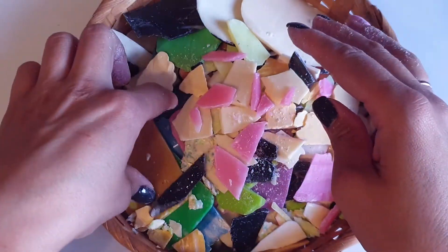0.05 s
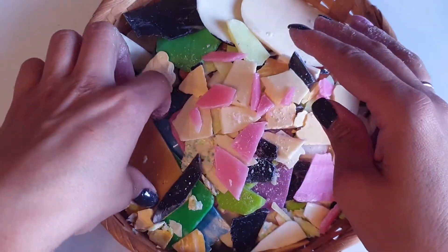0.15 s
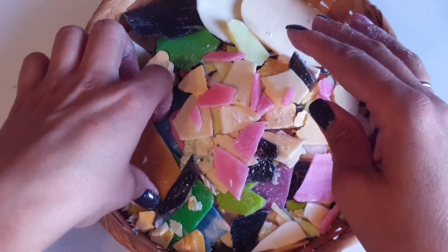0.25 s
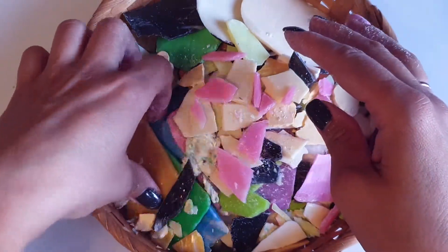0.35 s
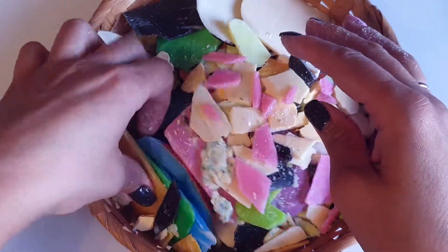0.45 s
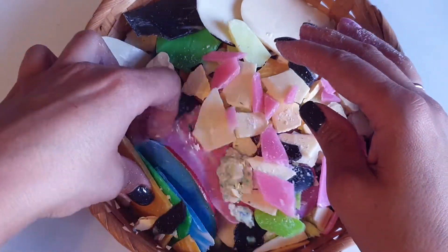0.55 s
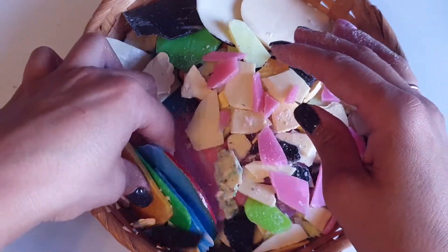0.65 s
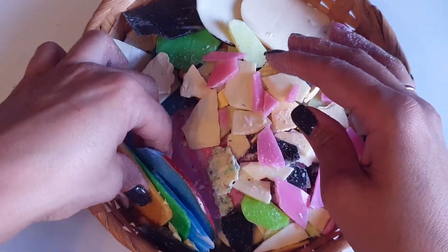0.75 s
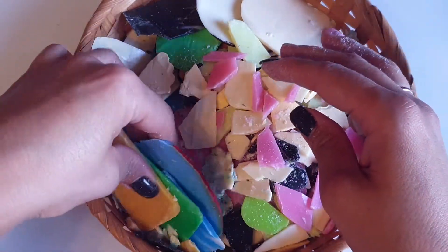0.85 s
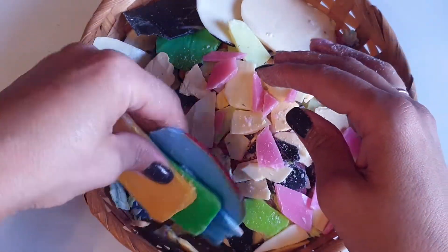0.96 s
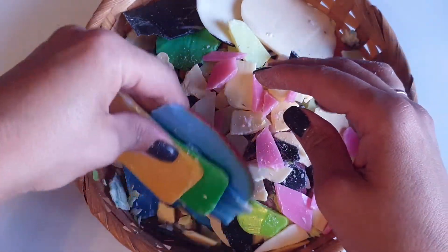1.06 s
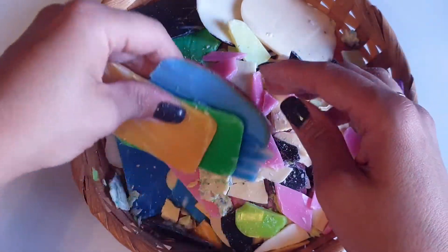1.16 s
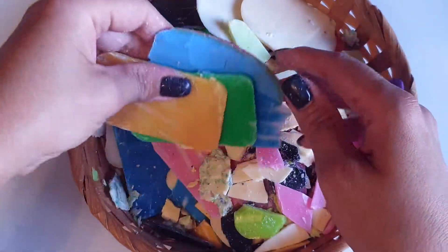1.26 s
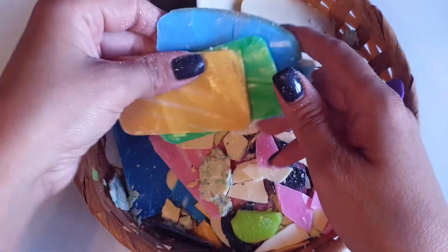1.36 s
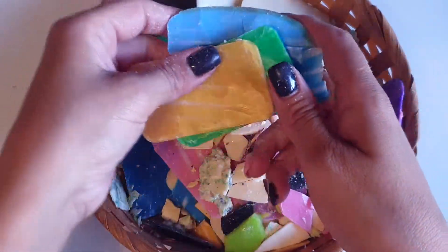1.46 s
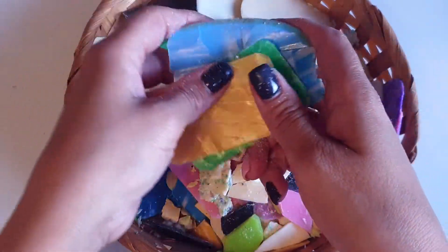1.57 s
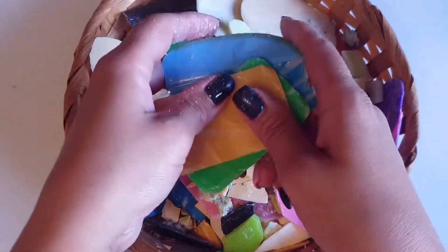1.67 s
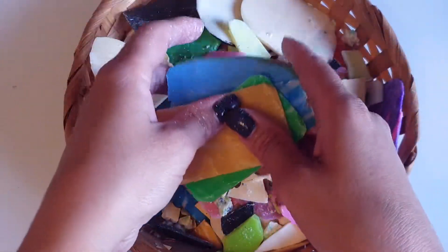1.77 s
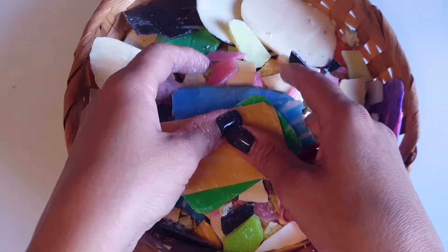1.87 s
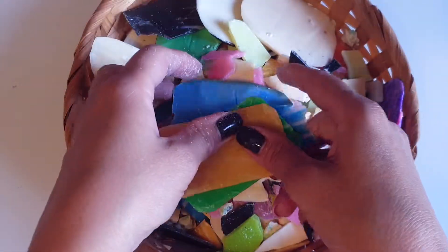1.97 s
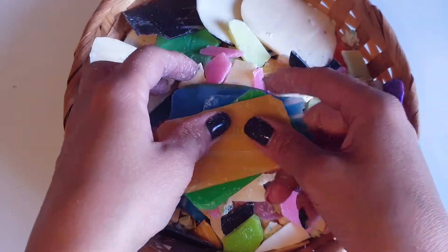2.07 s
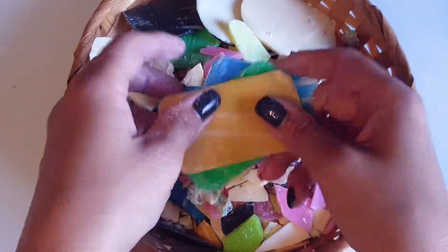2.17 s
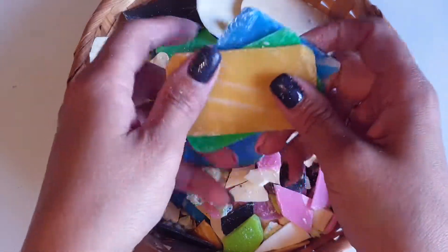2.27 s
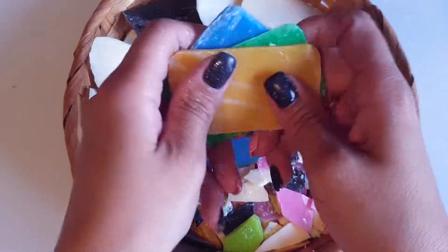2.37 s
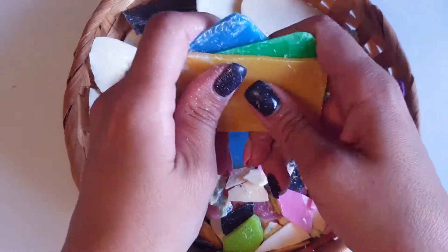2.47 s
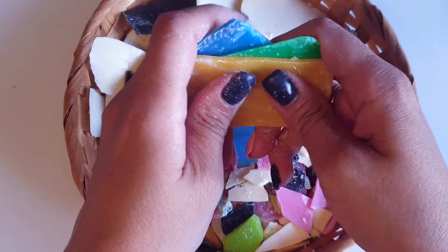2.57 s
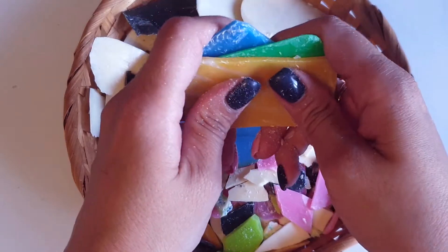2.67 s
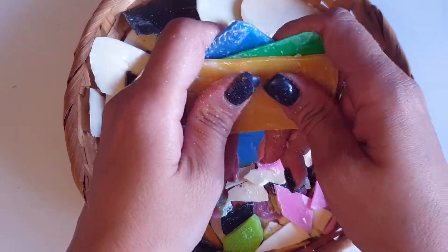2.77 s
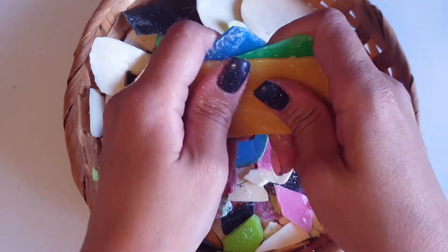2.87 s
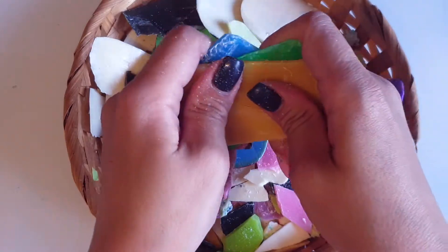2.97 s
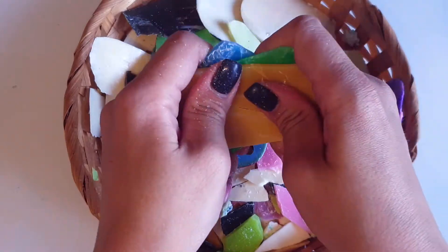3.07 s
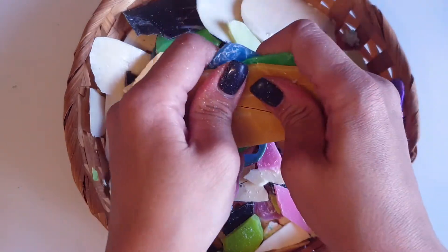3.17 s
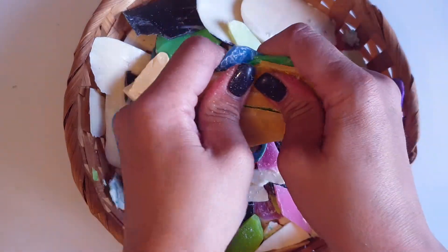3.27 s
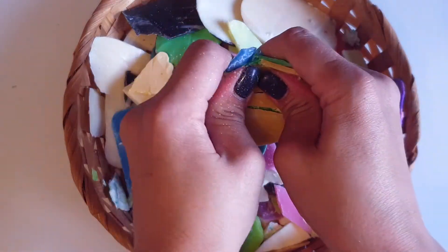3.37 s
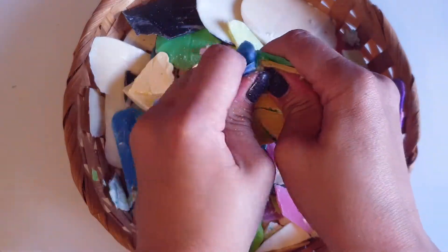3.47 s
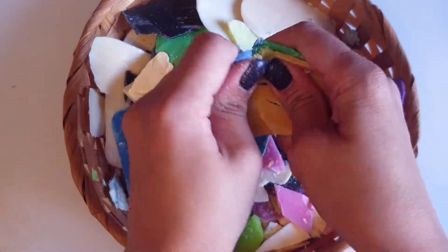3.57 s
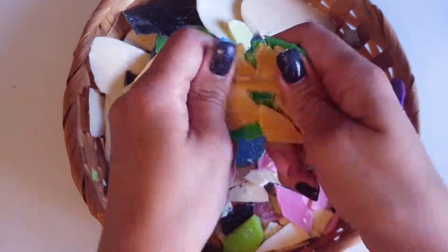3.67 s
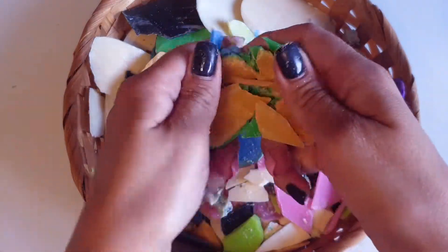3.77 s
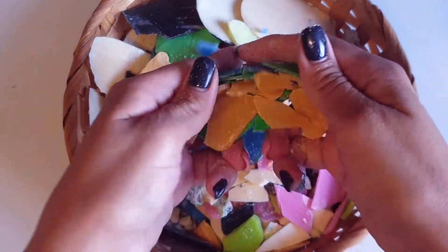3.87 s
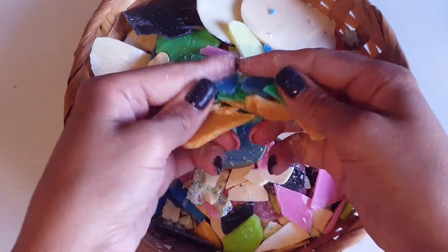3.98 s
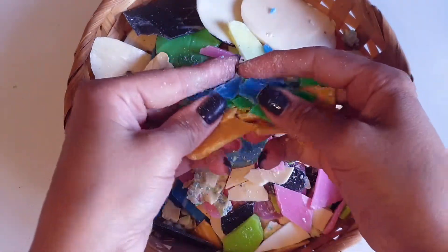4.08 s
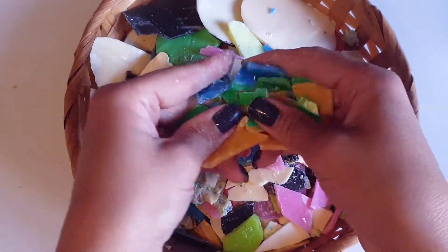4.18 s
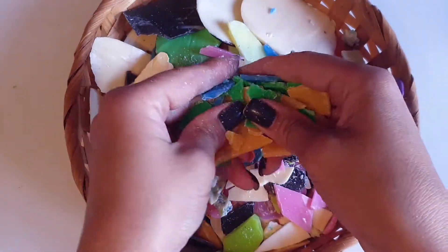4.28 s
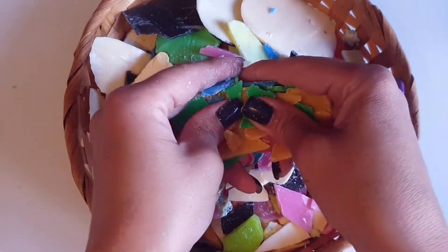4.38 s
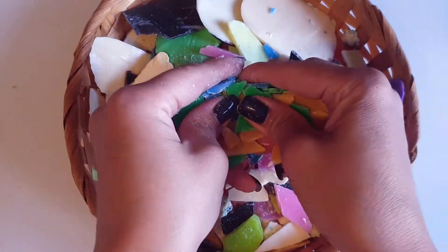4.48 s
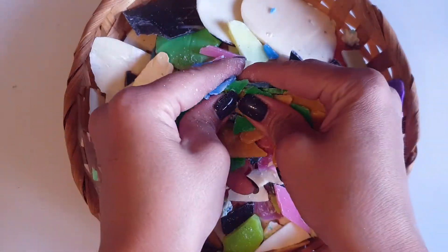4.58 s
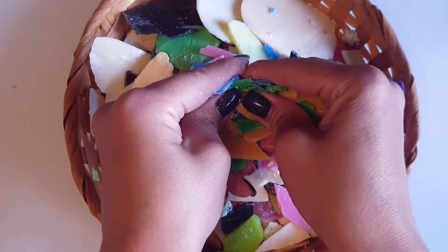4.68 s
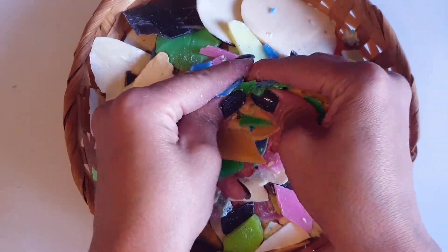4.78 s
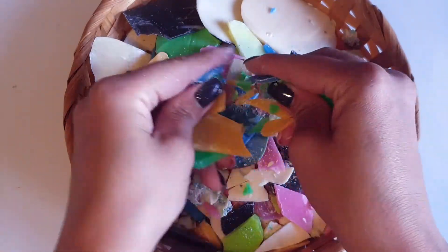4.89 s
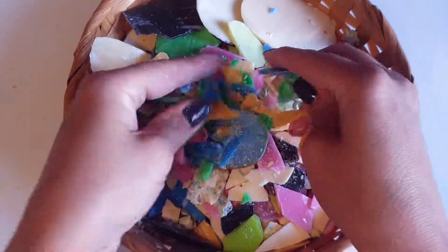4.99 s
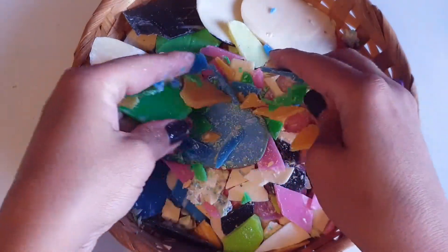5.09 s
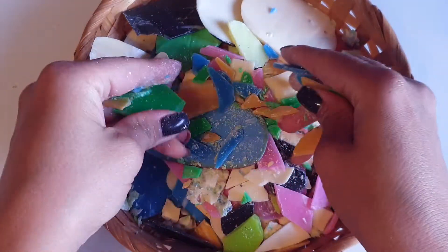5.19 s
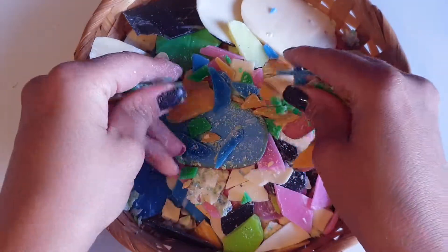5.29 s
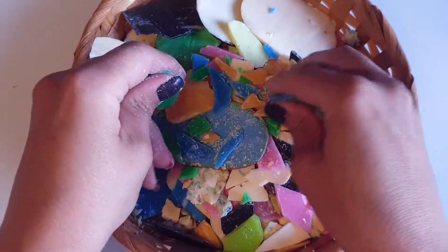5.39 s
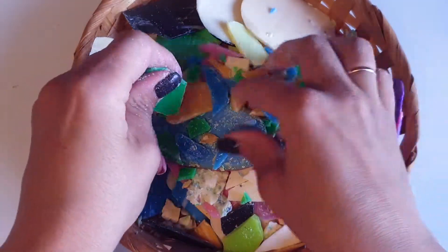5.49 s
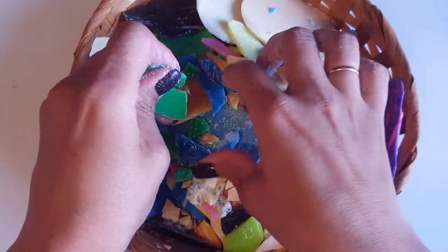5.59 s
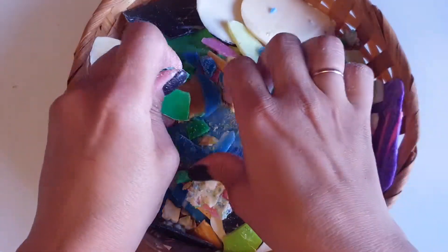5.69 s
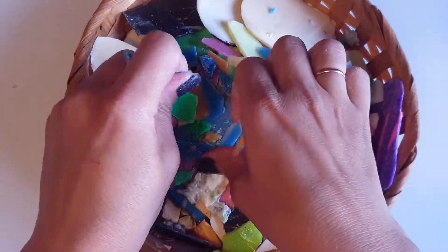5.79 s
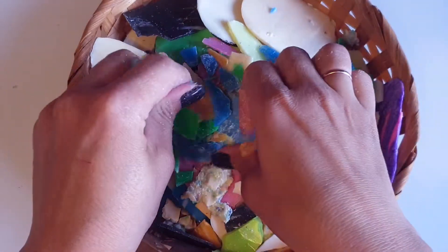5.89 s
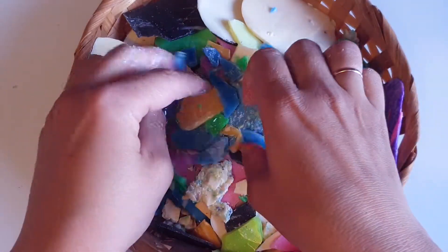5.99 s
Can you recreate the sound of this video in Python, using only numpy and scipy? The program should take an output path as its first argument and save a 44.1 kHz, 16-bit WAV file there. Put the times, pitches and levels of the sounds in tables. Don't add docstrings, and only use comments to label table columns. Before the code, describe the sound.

Thin dry soap shards rustle and knock in a wicker basket, then plates snap in loud sharp cracks and crumble into small clicking bits.

```python
import sys
import numpy as np
from scipy import signal
from scipy.fft import rfft, irfft
from scipy.io import wavfile

SR = 44100
rng = np.random.default_rng(int(sys.argv[2]) if len(sys.argv) > 2 else 0)


def transcribe(u):
    v = np.clip(np.atleast_2d(u).T, -1, 1)
    q = np.round(v * 32767).astype(np.int16)
    wavfile.write(sys.argv[1], SR, q)


def boost(x):
    u = np.asarray(x, float) / 20
    return 10 ** u


N = 266364

# (time [s], peak [dB], shard ring [Hz], support share [dB], crack length [ms])
SNAP_EVENTS = [(2.935, -1, 5100, -10, 0.92), (2.9385, -27, 4500, -23, 1.5), (2.951, -10.5, 3500, -38, 3.5),
               (2.9874, -15.5, 6500, -3.5, 1.6), (2.9935, -14.5, 6470, -32, 1.1),
               (3.0545, -14.5, 10300, -21, 1.5), (3.0664, -17, 7900, -41.5, .6),
               (3.0684, -4.5, 3020, -55, 2.1), (3.0721, -6, 5400, -9, 1.9), (3.0742, -6.5, 4600, -7, 0.82),
               (3.0762, -9, 3240, -9.5, 1.1), (3.0805, -9, 5000, -20, 3.2), (3.1203, -1.5, 4300, -33, 0.61),
               (3.1907, -30.5, 2880, -39, 6.2), (3.2265, -12.5, 2700, -9, 1.2),
               (3.2339, -6.5, 6240, -21.5, 1.2), (3.2369, -11, 5000, -26, 1.2),
               (3.2874, -19, 3270, -41, 0.77), (3.3055, -14.5, 5160, -40, 0.54),
               (3.3207, -15.5, 4600, -34, 1.3), (3.3252, -17.5, 6000, -28, 1.7),
               (3.3803, -38, 2430, -30, 1.1), (3.4178, -39, 2430, -39, 0.41),
               (3.4283, -21.5, 6300, -28, 1.74), (3.455, -23.5, 3620, -17, 2.1)]
# (time [s], peak [dB], shard ring [Hz], support share
# [dB])
HEAP_EVENTS = [(0.014, -40, 1320, -7), (0.025, -39, 1380, -2), (0.057, -34, 2880, -24),
               (0.063, -44, 2850, -30), (0.081, -43, 2900, -27), (0.092, -51, 2250, -18),
               (0.104, -58, 2260, -20), (0.128, -52, 2880, -23), (0.148, -57, 2300, -18),
               (0.183, -44.5, 2950, -44), (0.217, -64, 1280, -10), (0.235, -54.5, 2750, -13),
               (0.259, -61, 1200, -10), (0.278, -54, 1150, -45), (0.318, -74, 2300, -20),
               (0.337, -44, 2470, -34), (0.373, -43, 1310, 0), (0.397, -40, 1440, 18),
               (0.404, -43, 1420, -12), (0.43, -32, 2310, -6), (0.448, -33, 1840, -15),
               (0.454, -32, 1380, -65), (0.475, -36.5, 1420, -4), (0.506, -36, 2230, -19),
               (0.522, -36, 1350, 10), (0.582, -32, 1360, 6), (0.596, -24.5, 1950, -6),
               (0.602, -27, 1110, 4), (0.613, -43, 1550, 14), (0.627, -30.5, 1300, 15),
               (0.663, -51, 1460, -19), (0.673, -33, 1450, 3), (0.72, -38, 6900, -12),
               (0.769, -38.5, 6160, -13), (0.783, -39, 2670, -34), (0.788, -38, 6100, -17),
               (0.792, -30, 2820, -26), (0.795, -35, 2770, -23), (0.834, -32, 2900, -9),
               (0.858, -31, 2900, -29), (0.883, -33, 2800, -73), (0.977, -22, 6240, -13),
               (0.983, -37, 2210, -15), (1.004, -33.5, 1330, -11), (1.008, -34, 2790, -8),
               (1.014, -34.5, 1510, 3), (1.025, -31.5, 2870, -41), (1.04, -41.5, 1670, -28),
               (1.065, -43, 2120, -23), (1.111, -51, 5400, -30), (1.144, -44.5, 5800, -1)]
# (time [s], peak [dB], shard ring [Hz], support share [dB])
STACK_EVENTS = [(1.432, -62.5, 1570, -9), (1.499, -50, 6900, -4), (1.553, -42, 4070, -9.5),
                (1.58, -54, 1710, -10), (1.615, -64, 1310, -5), (1.646, -54, 4600, 9),
                (1.657, -41.5, 2190, -19), (1.717, -54, 1800, -16), (1.77, -46.5, 4970, -12),
                (1.87, -68, 1400, -7), (1.897, -60, 5000, 5), (1.927, -62, 2500, -10),
                (1.946, -34.5, 1285, -6), (1.958, -36.5, 1180, -3.5), (1.981, -44, 1080, -5),
                (1.988, -41.5, 1210, 0), (1.996, -38.5, 1160, -2), (2.029, -49, 2340, 1),
                (2.06, -48.5, 2270, -11), (2.088, -65, 6960, -30), (2.298, -63, 1160, 0),
                (2.31, -56, 4100, -3), (2.321, -53.5, 1510, -12), (2.377, -40.5, 1560, -19)]
# (time [s], peak [dB], shard ring [Hz], support share [dB])
CRUMB_EVENTS = [(3.625, -27.5, 6000, -21.5), (3.629, -34, 2730, -10.5), (3.637, -39.5, 2630, -16),
                (3.748, -46.5, 7900, -15), (3.776, -60, 3460, -23), (3.808, -51, 3600, 0),
                (3.82, -41, 3800, -13), (3.932, -37, 5660, -10), (3.937, -31, 6400, -14.5),
                (3.967, -45, 3810, -8), (4.002, -28, 7100, -22), (4.032, -39.5, 2700, -5.5),
                (4.073, -38, 2300, -4.5), (4.091, -34.5, 2740, -13), (4.113, -49, 2740, 12),
                (4.136, -44.5, 2520, -2), (4.179, -46.5, 10100, -43), (4.229, -45, 7000, -46),
                (4.247, -48, 5040, -22), (4.274, -53, 4400, -28), (4.335, -45.5, 10800, -69),
                (4.428, -36.5, 2550, -29.5), (4.436, -50, 4010, 13), (4.509, -49.5, 2730, -62),
                (4.548, -40.5, 10300, -26), (4.58, -41.5, 4640, -22), (4.602, -39.5, 2570, -31),
                (4.609, -35, 6600, -40), (4.66, -41, 2650, 2), (4.67, -37, 7200, -12.5)]
# (time [s], peak [dB], shard ring [Hz], support share [dB])
DROP_EVENTS = [(4.76, -36.5, 1670, -77), (4.803, -43, 2320, -3), (4.809, -45, 6600, -18),
               (4.819, -33, 5000, -20), (4.824, -24.5, 2660, -13), (4.851, -46, 2620, -22),
               (4.873, -32.5, 2560, -34), (4.885, -40.5, 2500, -2), (4.921, -36.5, 2590, -29),
               (4.932, -28.5, 5470, -12), (4.966, -36, 2700, -6.5), (4.981, -40, 2900, -8),
               (4.992, -32, 2640, -16), (4.998, -31, 2480, -14), (5.007, -41, 3000, -29),
               (5.027, -33.5, 4470, -9), (5.046, -37.5, 2900, -13), (5.079, -33, 4070, -4.5),
               (5.18, -47, 5100, -15), (5.214, -22, 6730, -18), (5.298, -40, 4250, -16)]
# (time [s], peak [dB], shard ring [Hz], support share [dB])
GATHER_EVENTS = [(5.384, -57, 3850, -8), (5.401, -46, 6330, -26), (5.413, -47, 3300, -64),
                 (5.431, -38, 5900, -18), (5.45, -38, 5400, -23), (5.474, -41, 4100, -29),
                 (5.489, -29.5, 8280, -20), (5.51, -31, 5130, -3.5), (5.536, -36.5, 3560, -6.5),
                 (5.567, -41, 3000, -6), (5.583, -22, 6100, -15), (5.59, -26, 6400, -19),
                 (5.683, -42.5, 2300, -16), (5.704, -43.5, 2590, 5), (5.772, -39.5, 4140, -9),
                 (5.78, -35, 2600, -7), (5.786, -47, 1150, -12), (5.867, -53, 1270, -14),
                 (5.879, -45, 1180, -3), (5.942, -52, 2600, 4), (5.964, -44.5, 7000, -6),
                 (5.981, -52, 1420, -8), (5.996, -44.5, 1450, -2), (6.006, -42, 6500, -22),
                 (6.02, -29, 7460, -15.5), (6.028, -30.5, 5500, 5)]
# (start [s], hold [s], dry rustle [dB], depth in heap [dB], shard ring [Hz])
SLIDE_MOVES = [(0.0, 0.033, -59.5, 0.5, 2380), (0.058, 0.21, -79.5, -10, 2800),
               (0.38, 0.25, -60, 2.5, 2350), (0.596, 0.065, -56.5, -6, 2320),
               (0.793, 0.092, -55.5, -5, 2700), (1.012, 0.056, -58, -5, 2680),
               (1.469, .33, -77.5, -7, 2420), (1.895, 0.19, -87, 12.5, 2270), (2.346, 0.037, -96, 6, 2500),
               (2.387, 0.0061, -56.5, -32, 2480), (2.106, 0.12, -96, 19.5, 1540),
               (2.563, 0.032, -79.5, -22, 2500), (3.047, 0.27, -53, -37, 3000),
               (3.444, .01, -54.5, -15.5, 3500), (3.666, 0.014, -56, -13, 2540),
               (3.807, 0.081, -62.5, -9.5, 3000), (3.947, 0.32, -63, -19, 2600),
               (4.442, 0.22, -62.5, -15, 2860), (4.79, 0.33, -60.5, -5, 2610), (5.23, 0.076, -73, -8, 2600),
               (5.444, 0.18, -52.5, -5.5, 3300), (5.66, 0.28, -65.5, -2.5, 2550), (6, .1, -58.5, 3.5, 2680)]
# (centre [Hz], width [Hz], level [dB])
HEAP_MODES = [(298, 260, -5.5), (815, 270, 2), (1133, 160, 5), (1397, 237, 9.5), (1630, 2100, -2.5)]
# (frequency [Hz], density [dB])
RUSTLE_SPECTRUM = [(2060, -51.5), (3500, -18.5), (5530, -12.5), (9260, -19), (13300, -22.5), (16000, -26.5)]
# (centre [Hz], width [Hz], level [dB])
HAND_MODES = [(4400, 500, -13.5), (6400, 600, -30)]
# (from [s], lower ring [Hz], upper ring [Hz], lower lift [dB], upper lift [dB])
HAND_SHAPES = [(3.549, 1400, 2570, 7, -6), (3.79, 1450, 2900, 6, -27), (3.92, 1410, 2580, 2, 1),
               (4.04, 1315, 2490, 5, 8), (4.15, 1480, 2790, -8, -20), (4.4, 1440, 2700, 11.5, -2),
               (4.56, 1750, 2920, 0, -18), (4.64, 1430, 2730, -6, -13), (4.79, 1380, 2680, 6.5, -21),
               (4.95, 1340, 2750, 6, -13), (5.06, 1280, 2900, 5, -14), (5.2, 1300, 2530, 5, 9.5),
               (5.29, 1200, 3060, -4, -14), (5.42, 1400, 2550, -1, 2), (5.575, 1760, 3160, -3, -13),
               (5.68, 1350, 2370, 6, -16), (5.76, 1190, 2640, 3, -18), (5.85, 1360, 2800, 6.5, -11),
               (5.96, 1390, 2590, -3, -19)]
# (frequency [Hz], T60 [s])
ROOM_DECAY = [(500, 0.29), (1400, 0.22), (4000, 0.27), (12000, 0.27)]
# (frequency [Hz], level against direct sound [dB])
ROOM_LEVEL = [(300, -2.5), (1400, -3.5), (4000, -4), (8000, -8), (14000, -4.5)]
# (frequency [Hz], likeness [0-1])
ROOM_ALIKE = [(300, 0.82), (1200, 0.64), (4000, 0.093)]
# (frequency [Hz], density [dB])
FLOOR_SPECTRUM = [(15, -30), (25, -11.5), (49, -6), (65, -8), (92, -7.5), (245, -6.5), (349, -16),
                  (389, -16), (766, -25.5), (927, -29.5), (8140, -43), (15200, -33.5), (16500, -71.5)]
# (frequency [Hz], likeness [0-1])
FLOOR_ALIKE = [(30, 0.42), (200, 0.66), (1000, 0.14), (8000, .1)]
# (centre [Hz], width [Hz], level [dB])
RUMBLE_HUMPS = [(96.5, 6.7, -73), (186.8, 11, -73.5), (211.7, 8.2, -78), (246, 19, -80.5)]
# (frequency [Hz], rms [dB], left lift [dB])
MOTOR_LINES = [(45.1, -68.5, 0.3), (145, -73.5, 1.5)]

CUPPED_S = 3.55


def rms_one(x):
    return x / np.sqrt(np.mean(x ** 2) + 1e-20)


def at_hz(points, hz):
    table_hz, values = np.transpose(points)
    return np.interp(np.log(hz), np.log(table_hz), values)


def resonance(x, hz, width_hz):
    r = np.exp(-np.pi * width_hz / SR)
    zeros = [(1 - r * r) / 2, 0, (r * r - 1) / 2]
    poles = [1, -2 * r * np.cos(2 * np.pi * hz / SR), r * r]
    return signal.lfilter(zeros, poles, x)


def passed(x, hz, kind, order=2):
    return signal.sosfilt(signal.butter(order, hz, kind, fs=SR, output="sos"), x)


def coloured(x, spectrum):
    hz = np.maximum(np.arange(N // 2 + 1) * SR / N, 1)
    return irfft(rfft(x) * boost(at_hz(spectrum, hz)), N)


def two_ears(rows, alike):
    alike = np.clip(alike, 0, 1)
    return np.array([rows[0], alike * rows[0] + np.sqrt(1 - alike ** 2) * rows[1]])


def crack_noise(size, length_ms, after_db):
    t = np.arange(size) / SR
    noise = rng.standard_normal((2, size)) * boost(2.8 * rng.standard_normal(size))
    run = t / (max(length_ms, 0.4) / 1000)
    front = np.exp(-run ** 2)
    uneven_db = 3.5 * rng.standard_normal(size // 32).repeat(32)
    splinters = boost(after_db + uneven_db) * np.exp(-t / 0.007)
    onset = 1 - np.exp(-run / 0.075)
    return noise * onset * (front + splinters)


def cracks(events, body, left_db, gain_db, low_db, edge_db, after_db, reach_hz, ring_width):
    size = 2048
    out = np.zeros((2, N + size))
    for s, peak_db, hz, dull_db, length_ms in events:
        noise = crack_noise(size, length_ms, after_db)
        burst = two_ears(noise, alike=0.65)
        skirt_hz = [min(hz / 2.19, reach_hz), min(hz * 2.63, 13000)]
        shard = resonance(burst, hz, ring_width * hz) + 0.42 * passed(burst, skirt_hz, "band")
        support = body(two_ears(noise, alike=0.88))
        edge = passed(two_ears(noise, alike=0.5), [5000, 14000], "band")
        bright_db = edge_db - 0.3 * dull_db - 8 * np.log2(hz / 3000)
        levels_db = [0, low_db + dull_db, bright_db]
        sound = sum(boost(db) * p / np.abs(p).max() for p, db in zip([shard, support, edge], levels_db))
        place = rng.standard_normal()
        sound[1] = np.roll(sound[1], round(1.3 * place))
        tilt_db = (left_db + 1.3 * place) * np.array([[0.5], [-0.5]])
        at = round(s * SR)
        out[:, at:at + size] += boost(peak_db + gain_db + tilt_db) * sound / np.abs(sound[0]).max()
    return out[:, :N]


def plate(x):
    thud = passed(passed(x, [300, 600], "band"), 240, "high")
    return passed(x, [700, 1800], "band") + 0.49 * thud


def echo(x, lag_s, feed):
    return signal.lfilter([1, *np.zeros(round(lag_s * SR) - 1), feed], [1], x)


def snaps():
    snapped = cracks(SNAP_EVENTS, plate, left_db=4.5, gain_db=0.5, low_db=-6.5, edge_db=-14,
                     after_db=-21, reach_hz=1950, ring_width=0.24)
    softened = 0.42 * passed(snapped, 11000, "low") + 0.56 * snapped
    return echo(softened, lag_s=0.0014, feed=0.43)


def with_length(events, usual_ms):
    scatter = 0.25 * rng.standard_normal(len(events))
    return [(*row, usual_ms * np.exp(z - 0.05 * (row[1] + 35))) for row, z in zip(events, scatter)]


def heap(x):
    shifts = np.exp(0.07 * rng.standard_normal(len(HEAP_MODES)))
    out = 0
    for k, (hz, width_hz, db) in enumerate(HEAP_MODES):
        out = out + (-1) ** k * boost(db) * resonance(x, hz * shifts[k], width_hz)
    return out


def heap_knocks():
    dug = cracks(with_length(HEAP_EVENTS, usual_ms=1.83), heap, left_db=7.5, gain_db=0.0,
                 low_db=-3.5, edge_db=-21.0, after_db=-7, reach_hz=3000, ring_width=0.093)
    stacked = cracks(with_length(STACK_EVENTS, usual_ms=1.5), heap, left_db=9.0, gain_db=0.5,
                     low_db=1.0, edge_db=-46, after_db=-9.5, reach_hz=3000, ring_width=0.13)
    return dug + stacked


def crumbled_bits():
    events = with_length(CRUMB_EVENTS + DROP_EVENTS + GATHER_EVENTS, usual_ms=1.61)
    return cracks(events, plate, left_db=8.5, gain_db=0.5, low_db=1.5, edge_db=-25.0,
                  after_db=-11, reach_hz=2900, ring_width=0.12)


def hollow(x):
    thin = passed(x, 1125, "high")
    out = thin + sum(boost(db) * resonance(thin, hz, width_hz) for hz, width_hz, db in HAND_MODES)
    starts = [round(row[0] * SR) for row in HAND_SHAPES] + [N]
    for (_, low_hz, upper_hz, low_db, upper_db), a, b in zip(HAND_SHAPES, starts, starts[1:]):
        out[:, a:b] += boost(low_db) * resonance(thin[:, a:b], low_hz, width_hz=100)
        out[:, a:b] += boost(upper_db) * resonance(thin[:, a:b], upper_hz, width_hz=120)
    return out


def slip_noise(per_s, spread_db):
    clump_samples = 512
    sizes = boost(spread_db * np.minimum(rng.exponential(1, N), 4))
    clumps = boost(4.0 * rng.standard_normal(N // clump_samples + 1)).repeat(clump_samples)[:N]
    slips = sizes * (rng.random(N) < per_s * clumps / SR)
    slips = signal.lfilter([1], [1, -0.96], slips)
    return rng.standard_normal((2, N)) * slips


def rustle(per_s, spread_db):
    rise_db_per_s, fall_db_per_s = 304.5, 189
    t = np.arange(N) / SR
    noise = slip_noise(per_s, spread_db)
    edges = rms_one(coloured(two_ears(noise, alike=0.17), RUSTLE_SPECTRUM))
    both = np.zeros((2, N))
    for s, hold_s, db, depth_db, hz in SLIDE_MOVES:
        span = (t > s - 0.2) & (t < s + hold_s + 0.4)
        before_s = np.maximum(s - t[span], 0)
        after_s = np.maximum(t[span] - s - hold_s, 0)
        shape_db = -rise_db_per_s * before_s - fall_db_per_s * after_s
        pile = boost(depth_db) * rms_one(heap(two_ears(noise[:, span], alike=0.39)))
        shard = rms_one(resonance(two_ears(noise[:, span], alike=1.0), hz, width_hz=280))
        shard = boost(-5.5 + 0.2 * depth_db) * shard
        both[:, span] += boost(db + shape_db) * (pile + shard + edges[:, span])
    both = both * boost([[3.2], [-3.2]])
    return both * (t < CUPPED_S), both * (t >= CUPPED_S)


def room(x):
    size = SR // 2
    t = np.arange(size) / SR
    tail, white = 0, rng.standard_normal((2, 2, size))
    for k, hz in enumerate(250 * 2. ** np.arange(0, 6.1, 0.5)):
        band = passed(white[k % 2], [hz / 2 ** (1 / 4), hz * 2 ** (1 / 4)], "band")
        band = two_ears(band, at_hz(ROOM_ALIKE, hz))
        dying = boost(-60 * t / at_hz(ROOM_DECAY, hz))
        tail = tail + band * dying * boost(at_hz(ROOM_LEVEL, hz)) / np.sqrt(np.sum(dying ** 2))
    tail = tail * np.clip((t - 0.0025) / 0.002, 0, 1)
    return signal.fftconvolve(x, tail, axes=1)[:, :N]


def snap_room():
    walls = 4
    return sum(room(snaps()) for _ in range(walls)) / np.sqrt(walls)


def floor():
    mid, side = rng.standard_normal((2, N))
    broad_mid = coloured(mid, FLOOR_SPECTRUM)
    scale = boost(-66) / np.sqrt(np.mean(broad_mid ** 2))
    t = np.arange(N) / SR
    humps = 0
    for hz, width_hz, db in RUMBLE_HUMPS:
        swell = np.interp(t, np.arange(32) / 4, rng.standard_normal(32))
        hump = resonance(resonance(mid[::-1], hz, width_hz), hz, width_hz)
        humps = humps + boost(db + 3.0 * swell) * rms_one(hump)
    apart = [(hz, 10 * np.log10(np.clip((1 - c) / (1 + c), 1e-3, 1))) for hz, c in FLOOR_ALIKE]
    broad_side = coloured(coloured(side, FLOOR_SPECTRUM), apart)
    both = scale * broad_mid + humps + scale * broad_side * [[1], [-1]]
    return both * boost([[2], [-2]])


def motor():
    t, out = np.arange(N) / SR, 0
    for hz, db, left_db in MOTOR_LINES:
        level, phase = [np.interp(t, np.arange(64) / 10, row) for row in rng.standard_normal((2, 64))]
        line = boost(db + 0.8 * level) * np.sqrt(2) * np.sin(2 * np.pi * hz * t + 0.59 * phase)
        out = out + line * boost([[left_db], [-left_db]])
    return out


def scene():
    digging, crumbling = rustle(per_s=1700, spread_db=3.5)
    knocks = heap_knocks() + digging
    crumbs = hollow(crumbled_bits() + boost(-3.0) * crumbling)
    soap = knocks + crumbs + snaps()
    soap[1] = np.roll(soap[1], 3)
    reflected = room(knocks + crumbs) + boost(-2.5) * snap_room()
    return soap + reflected + passed(floor(), 30, "high", order=6) + motor()


def band_limit(x):
    return signal.sosfilt(signal.butter(12, 16980, fs=SR, output="sos"), x)


def record(dry):
    rounded = dry / (1 + np.abs(dry / 0.86) ** 6) ** (1 / 6)
    top_cut = signal.cheby2(12, 60, 17000, fs=SR, output="sos")
    mix = signal.sosfilt(top_cut, rounded)
    return band_limit(mix)


dry = scene()
out = record(dry)
transcribe(out)
```